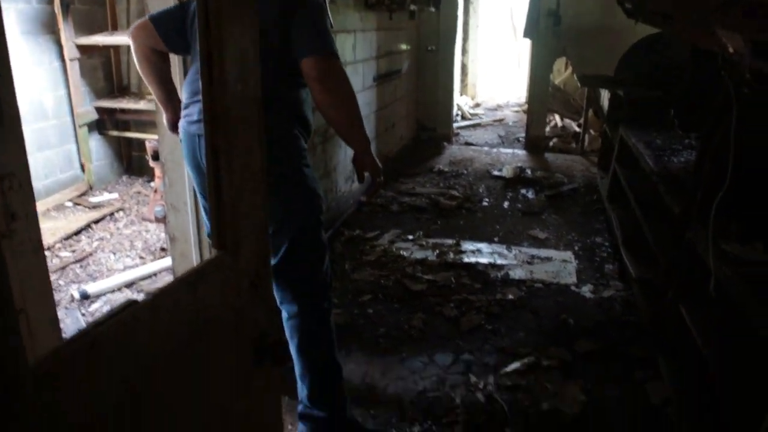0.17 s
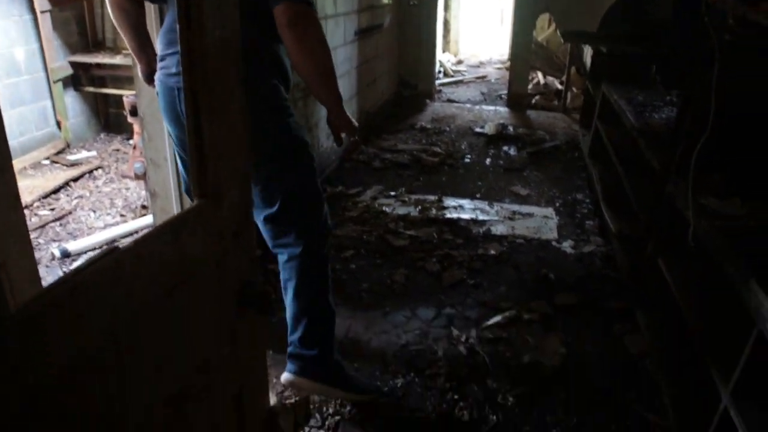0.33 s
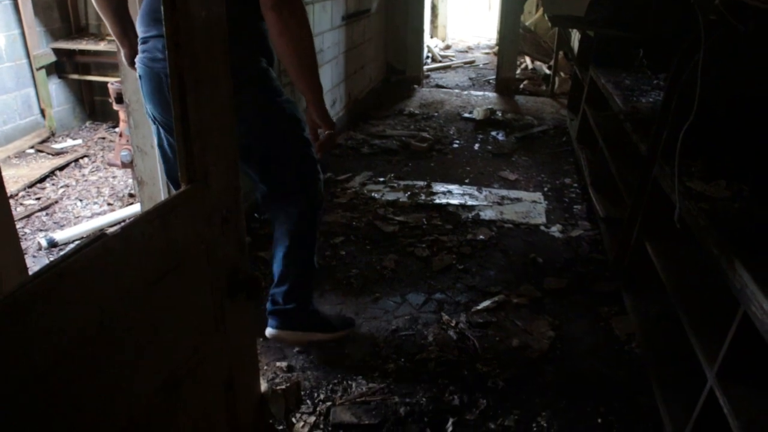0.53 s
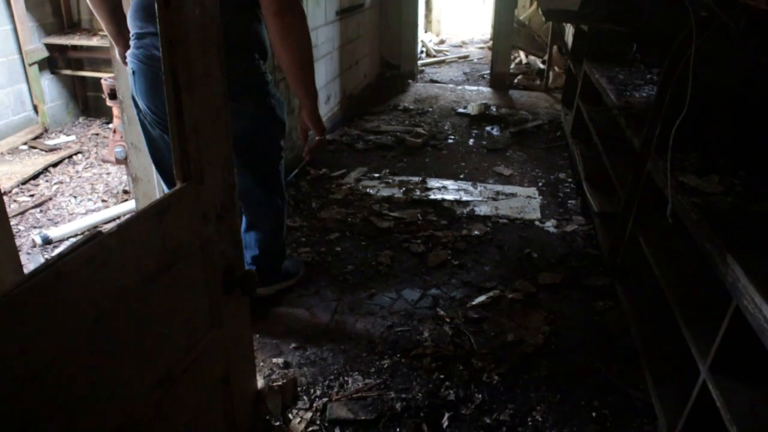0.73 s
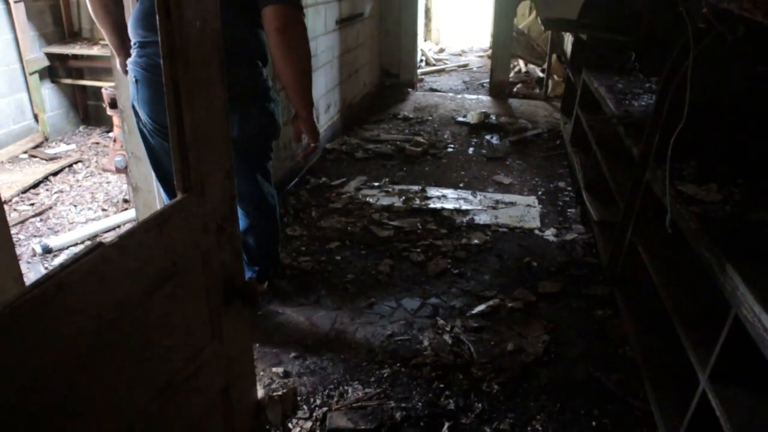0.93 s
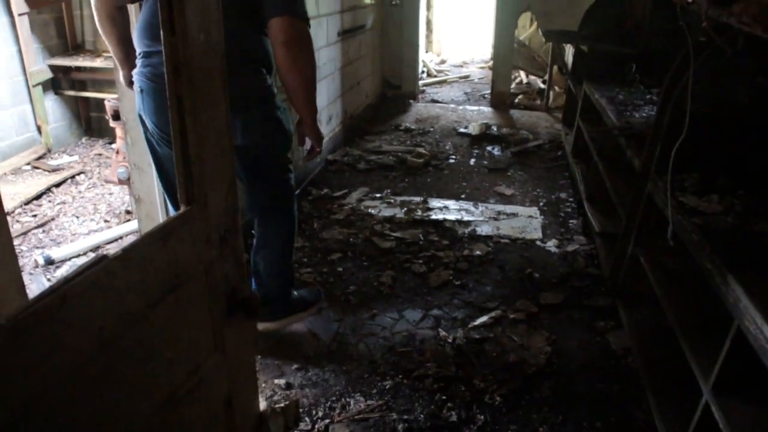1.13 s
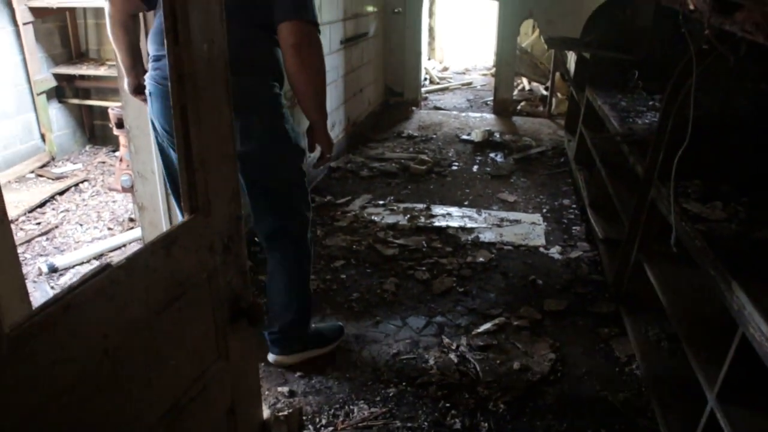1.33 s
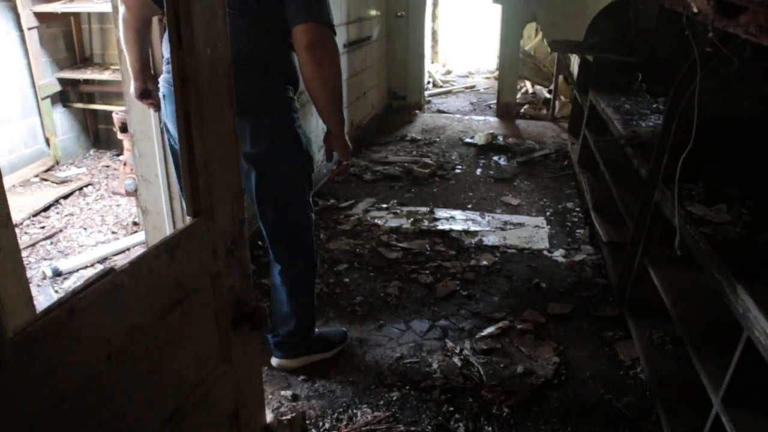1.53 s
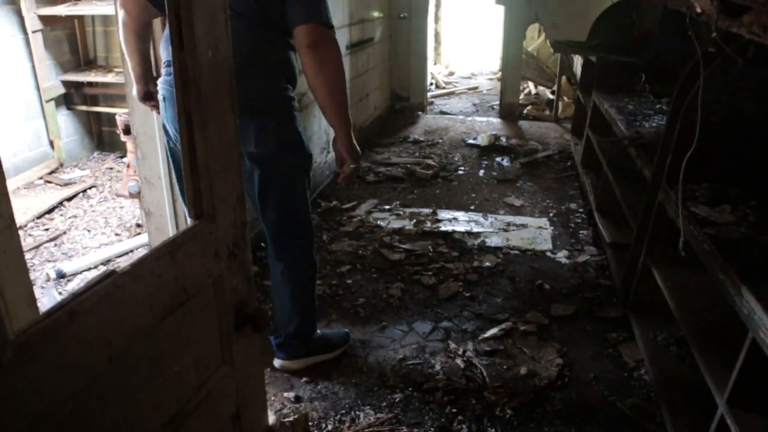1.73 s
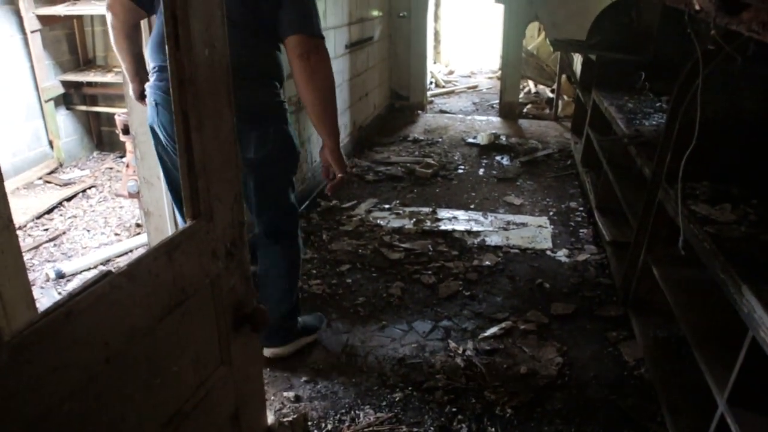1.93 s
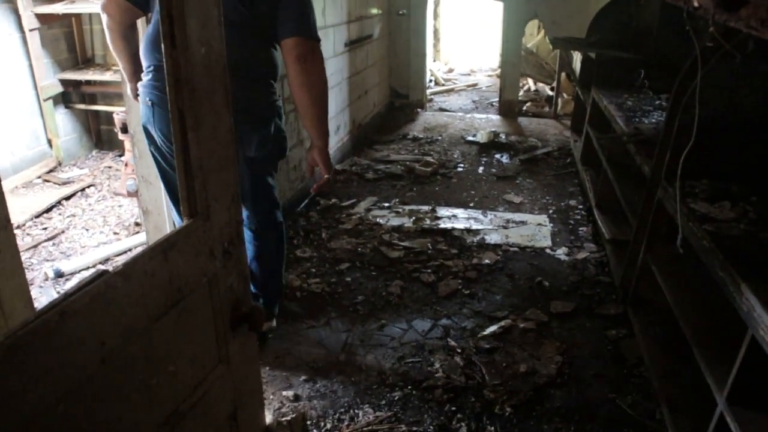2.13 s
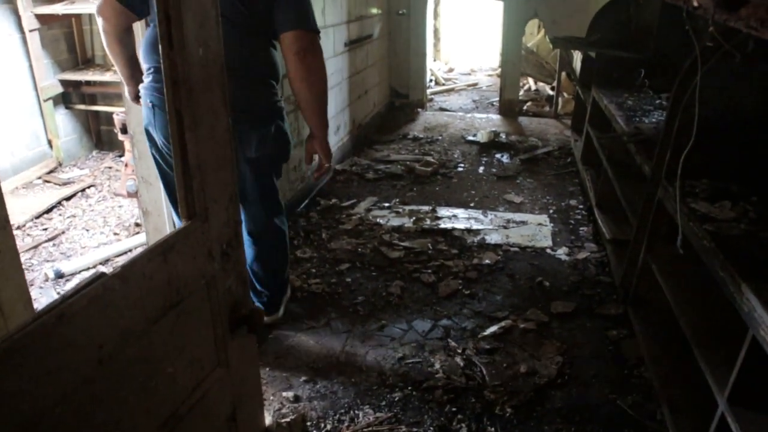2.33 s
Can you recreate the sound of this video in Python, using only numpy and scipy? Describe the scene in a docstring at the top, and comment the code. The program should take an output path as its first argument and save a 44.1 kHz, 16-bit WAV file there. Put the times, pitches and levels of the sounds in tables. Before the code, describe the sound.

A shoe crunches debris in an abandoned room, first a fading scuff, then the loudest gritty grind, a faint shuffle and a final crackling step, with short echo and quiet rumble and hiss behind.

```python
"""Shoes shuffle on broken tile and grit in an empty building, over quiet rumble and hiss.
A drag of the sole is already fading at the start, with soft thuds, then cracks and rattling shards.
The loudest drag comes at 0.7 s, a faint one at 1.4 s and another strong one just after 2 s.
Grit is made of random clicks through many tuned filters; thuds, cracks and shards are short rings.
A small bare room answers them all with a short tail of fading noise."""
import sys
import numpy as np
from scipy import signal
from scipy.fft import rfft, irfft
from scipy.io import wavfile
from scipy.ndimage import uniform_filter1d

SR = 44100
rng = np.random.default_rng(int(sys.argv[2]) if len(sys.argv) > 2 else 0)


def transcribe(u):
    """Save the signal u as a 16-bit wav file named by the first command-line argument.

    u: samples, shape (n,) or (channels, n), limited to [-1, 1]; the rate is SR.
    q: integer samples, one column per channel.
    """
    v = np.clip(np.atleast_2d(u).T, -1, 1)
    q = np.round(v * 32767).astype(np.int16)
    wavfile.write(sys.argv[1], SR, q)


N = 104869  # length in samples

# How hard the sole grinds during each drag. Each row: time in seconds, grit level in dB, then
# three levels in dB relative to the grit: low rub of the sole, coarse grit, fine treble.
FIRST_DRAG = [(0.0, -25, 6.5, -2, -7), (0.014, -26.5, -8.5, -9, 0.5), (0.086, -43.5, 0, -4, -4.5),
              (0.15, -49, -4.5, 0.5, -5.5), (0.158, -38.5, -16, -8, -10), (0.168, -45, 2.5, -13, 0),
              (0.196, -53.5, -5, -4, -5), (0.258, -63.5, 12, 4, 3), (0.3, -69, 8, -7, -9)]
LOUDEST_DRAG = [(.686, -45, -33, -8, -25), (.698, -17, -17, -6.5, -10), (.706, -19, -21, -14, -33),
                (.73, -23.5, -37, -5.5, -15), (.745, -26.5, -9, -6, -4.5), (.8, -28, -10, -5, -7),
                (.858, -28, -1.5, -5, -11), (.89, -30.5, -4.5, -4.5, 0), (.94, -40.5, -4, -5.5, -4.5),
                (.98, -50.5, -2, -10, -2), (1.04, -51, -5, 1, 0), (1.108, -54, -11, -5, -2),
                (1.118, -40.5, -20, 1, -12), (1.14, -48, -25, -7, -10), (1.208, -59, -12, -2, -2),
                (1.3, -68, -20, -3, -14)]
FAINT_DRAG = [(1.415, -79, 11, 4, -8), (1.421, -57.5, 0, -5, -11), (1.451, -47.5, 3, -2.5, -4.5),
              (1.473, -52, -8, -11, -9), (1.527, -67, 0, -5, -5), (1.587, -63, -4, -13, -5),
              (1.62, -57, -19, -19, -22)]
LAST_DRAG = [(1.89, -76, 8, 2, -5), (1.92, -56, 7, -7, 1), (1.958, -52.5, -15, 0, -4.5),
             (1.97, -40, -10, -10, -9), (1.982, -39.5, -9, -3.5, -4.5), (2.068, -28.5, -11.5, -9, -10.5),
             (2.11, -32, -9, -8.5, -5.5), (2.178, -33, -8.5, -5.5, -11.5), (2.278, -39.5, -3, -6.5, -6),
             (2.326, -51, -1, -1, -2), (2.378, -47, -8, -10, -0.5)]

# Tone colour of the grit on each patch of floor. Each row: frequency in Hz, relative level in dB per Hz.
FIRST_PATCH = [(150, 0.5), (300, -0.5), (506, 2), (1130, -2), (1400, -12), (2420, -17), (2900, -3.5),
               (3680, -6.5), (7620, -7), (10000, -15), (12500, -44), (15500, -40)]
LOUDEST_PATCH = [(150, -12.5), (400, -10.5), (585, -2), (1190, -3.5), (1350, -11), (1740, -2.5),
                 (2500, -2.5), (3610, -1), (6000, -6), (8660, -7.5), (11500, -23.5), (14000, -25),
                 (15500, -30)]
LAST_PATCH = [(150, -27), (506, -10.5), (742, -4.5), (1560, -12), (2300, -7), (2750, -3), (3200, -4),
              (3800, -3), (6000, -8), (8200, -10.5), (12000, -26.5), (15500, -36)]

# Tone colour of the rumble and hiss. Each row: frequency in Hz, relative level in dB per Hz.
AIR_COLOUR = [(20, -22), (40, -5.5), (64, -2.5), (120, -8), (289, -17.5), (478, -20.5), (800, -18),
              (1230, -19), (1700, -23.5), (4000, -29), (8000, -31), (12000, -36.5), (15500, -39)]

# Soft heel and toe thuds. Each row: start in seconds, level in dB, pitch in Hz,
# time to fade by 60 dB in seconds.
HEEL_TOE_THUDS = [(.003, -20.5, 501, 0.048), (.012, -24.5, 651, 0.077), (.055, -30, 170, 0.062),
                  (0.2746, -27.5, 360, 0.036), (.284, -28.5, 96, 0.11), (.302, -31, 101, 0.076),
                  (.335, -42.5, 219, 0.084), (.355, -38.5, 73, 0.087), (0.531, -40, 79, 0.099),
                  (1.075, -41.5, 264, 0.094), (1.098, -39.5, 240, 0.12), (1.151, -39.5, 76.6, 0.08),
                  (1.4223, -33, 406, 0.032), (1.426, -37, 643, 0.033), (1.431, -39.5, 187, 0.057),
                  (1.456, -40, 198, 0.035), (1.512, -40, 70, 0.11)]

# Pieces that crack or tick. Each row: start in seconds, level in dB, pitch in Hz,
# time to fade by 60 dB in seconds.
CRACKING_PIECES = [(0.0898, -25.5, 4090, 0.017), (.114, -43, 3730, .008), (0.158, -29, 4030, 0.016),
                   (.165, -30.5, 2300, 0.012), (.168, -36.5, 640, 0.039), (.218, -33, 1500, .006),
                   (.071, -25, 1010, 0.01), (.2512, -32.5, 700, .005), (.254, -36.5, 876, 0.026),
                   (.459, -35.5, 3000, 0.0033), (0.6947, -11.5, 3880, 0.011), (0.697, -10, 4600, 0.01),
                   (.7, -6, 3000, 0.0059), (.712, -16, 3800, 0.017), (0.75, -21, 2640, .01),
                   (1.0435, -30.5, 3500, 0.026), (1.049, -36, 750, 0.0087), (1.1137, -25, 1640, 0.0048),
                   (1.4234, -36, 2700, .004), (1.446, -37, 2880, 0.015), (1.4546, -32, 4020, .004),
                   (1.9142, -39, 5530, .006), (2.007, -25, 2800, 0.015), (2.039, -25, 3600, .012),
                   (2.06, -16.5, 3040, .012), (2.063, -17, 2520, .012), (2.0873, -13.5, 3560, 0.0029),
                   (2.139, -27, 2710, .01)]

# Loose shards that rattle. Each row: start in seconds, length in seconds, pitch in Hz,
# average (rms) level in dB, time to fade by 60 dB in seconds.
LOOSE_SHARDS = [(.125, 0.044, 4040, -48.5, .015), (.152, 0.024, 5500, -44, 0.025),
                (0.7, 0.027, 3130, -26, 0.033), (0.929, 0.03, 4530, -48, .03),
                (1.002, 0.085, 6550, -49.5, 0.027), (1.005, 0.022, 4700, -51, .03),
                (1.043, 0.059, 3520, -45.5, 0.028), (1.048, .055, 8870, -55, .03),
                (1.107, 0.039, 6550, -52, 0.035), (1.116, 0.038, 1930, -47, 0.015),
                (1.159, 0.034, 7600, -55, .04), (1.179, 0.023, 3370, -56, .03),
                (1.238, 0.016, 7480, -65, .04), (1.965, 0.14, 2860, -43.5, 0.017),
                (2.033, 0.054, 3700, -41.5, .02), (2.054, 0.22, 2620, -40.5, 0.015)]

GRAINS_PER_S, GRAIN_SCATTER_DB, FLUTTER_DB = 2500, 1.5, 1
SHARED = 0.38  # weight of the clicks that all grain sizes have in common
AIR_DB = -49
SNAP_DB = -10
RATTLE_PER_S, RATTLE_SCATTER_DB = 700, 1.6
ROOM_T60_S, ROOM_DB, ROOM_HZ = 0.3, -11.5, 5100
TOP_HZ = 15750


def undb(db):
    """Turn decibels into a plain multiplier."""
    return 10 ** (np.asarray(db) / 20)


def rms1(x):
    """Scale a sound to an average (rms) level of 1."""
    return x / np.sqrt(np.mean(x ** 2))


def mode(x, hz, t60):
    """One fading ring: each click in x starts a sine at hz that drops 60 dB in t60 seconds."""
    pole = np.exp(2j * np.pi * hz / SR - np.log(1000) / (t60 * SR))
    return signal.lfilter([1], [1, -pole], x).imag


def spectrum(table, hz):
    """Read a tone colour at any frequency, with straight lines over log frequency."""
    table_hz, db = np.array(table).T
    return np.interp(np.log(hz), np.log(table_hz), db)


def walk(rate):
    """A wandering level: a new random value rate times a second, joined by ramps, spread about 1."""
    hold = int(SR / rate)
    steps = np.repeat(rng.standard_normal(N // hold + 1), hold)
    return rms1(uniform_filter1d(steps, hold))[:N]


def clicks(n, rate, scatter_db):
    """Clicks at random times with random sign, a few of them larger."""
    chance = rng.random(n)
    sign = np.sign(rng.standard_normal(n))
    size = undb(scatter_db * rng.exponential(size=n))
    # the steep slope makes nearly every click either full or absent
    return np.clip((rate / SR - chance) * 2000, 0, 1) * sign * size


def peak_filter(x, hz, q):
    """Keep a narrow band around hz; a higher q is narrower."""
    return signal.lfilter(*signal.iirpeak(hz, q, SR), x)


def grains(hz):
    """Grains of every size click; each size rings a few cycles at its own pitch."""
    common = rms1(clicks(N, GRAINS_PER_S, GRAIN_SCATTER_DB))
    streams = []
    for _ in range(6):
        own = rms1(clicks(N, GRAINS_PER_S, GRAIN_SCATTER_DB))
        streams.append(SHARED * common + (1 - SHARED) * own)
    bands = []
    for k, pitch in enumerate(hz):
        ringing = peak_filter(streams[k % 6], pitch, 5.6)
        bands.append(rms1(peak_filter(ringing, pitch, 7.7)))
    return np.array(bands)


def drag(curve, colour, hz, bed):
    """The sole presses the grains as hard as its curve says, in the colour of this patch of floor."""
    points = np.array(curve)
    first, last = int(points[0, 0] * SR), min(int(points[-1, 0] * SR) + 1, N)
    t = np.arange(first, last) / SR
    grit, rub, coarse, fine = (np.interp(t, points[:, 0], points[:, k]) for k in range(1, 5))
    # the bands widen with pitch, so each gets more power than its level per Hz
    band_db = spectrum(colour, hz) + 10 * np.log10(hz)
    # four groups of bands: rub, coarse grit, main grit, fine treble
    group = np.searchsorted([1350, 2450, 6800], hz)
    # each group's loudness is set from the bands between these limits in Hz
    limits = [(350, 1300), (1400, 2400), (2500, 6500), (7000, 14000)]
    out = np.zeros(N)
    for g, relative_db in enumerate((rub, coarse, 0, fine)):
        low, high = limits[g]
        power = np.sum(undb(2 * band_db[(hz > low) & (hz < high)]))
        weight = undb(band_db[group == g]) / np.sqrt(power)
        out[first:last] += weight @ bed[group == g, first:last] * undb(grit + relative_db)
    return out


def air():
    """Coloured noise split near 100 Hz: a wavering rumble below and a slightly wavering hiss above."""
    f = np.fft.rfftfreq(N, 1 / SR) + 1
    noise = rfft(rng.standard_normal(N)) * undb(spectrum(AIR_COLOUR, f)) * (f > 18)
    low = 1 / (1 + (f / 100.0) ** 2)
    rumble = irfft(noise * low, N) * undb(1.2 * walk(7.84))
    hiss = irfft(noise * (1 - low), N) * undb(0.78 * walk(5.22))
    return undb(AIR_DB) * rms1(rumble + hiss)


def thuds():
    """Soft pushes into the floor; each spot answers at its own low pitch, with a weaker overtone."""
    n = 8000
    out, push = np.zeros(N + n), np.zeros(n)
    push[0] = -1
    for start, db, hz, t60 in HEEL_TOE_THUDS:
        i = int(start * SR)
        ring = mode(push, hz, t60) + 0.21 * mode(push, 1.7 * hz, 0.63 * t60)
        out[i:i + n] += undb(db) * ring
    return uniform_filter1d(out[:N], size=24)  # averaging neighbours softens the edges


def cracks():
    """A piece breaks or jumps: a sharp snap of noise and a brief ring with an overtone."""
    n, snap_n = 3000, 400
    out, click = np.zeros(N), np.zeros(n)
    click[0] = 1
    snap_fade = np.exp(-np.arange(snap_n) / 60)
    for start, db, hz, t60 in CRACKING_PIECES:
        i = int(start * SR)
        piece = mode(click, hz, t60) + 0.2 * mode(click, 1.44 * hz, 1.4 * t60)
        puff = rng.standard_normal(snap_n) * snap_fade
        piece[:snap_n] += undb(SNAP_DB) * mode(puff, hz, 0.001) / 4
        # remove what lies well below the pitch
        thin = signal.lfilter(*signal.butter(2, 0.34 * hz, "high", fs=SR), piece)
        out[i:i + n] += undb(db) * thin
    return out


def shards():
    """A loose shard chatters on the floor and rings at a close pair of pitches."""
    n = SR // 3
    out, t = np.zeros(N + n), np.arange(n) / SR
    for start, length, hz, db, t60 in LOOSE_SHARDS:
        i = int(start * SR)
        taps = clicks(n, RATTLE_PER_S, RATTLE_SCATTER_DB)
        taps[0] = 1.8  # a sure first knock
        taps = taps * np.clip(1 - (t / length) ** 3, 0, 1)
        ring = mode(taps, hz, t60) + 0.37 * mode(taps, 1.03 * hz, 0.76 * t60)
        out[i:i + n] += undb(db) * ring / np.sqrt(np.sum(ring ** 2) / (length * SR))
    return out[:N]


def room(x):
    """Bare walls send back many echoes: a short fading noise tail, duller than the source."""
    t = np.arange(SR // 2) / SR
    tail = rng.standard_normal(len(t)) * undb(-60 * t / ROOM_T60_S) * (t > .003)
    tail = signal.lfilter(*signal.butter(1, ROOM_HZ, fs=SR), tail)
    tail = tail / np.sqrt(np.sum(tail ** 2))
    return x + undb(ROOM_DB) * signal.fftconvolve(x, tail)[:N]


def scene():
    """Four drags over one bed of grains, with thuds, cracks and shards in the room, plus air."""
    hz = np.geomspace(160, 15300, num=44)  # pitches of the grain sizes
    bed = grains(hz) * undb(FLUTTER_DB * walk(59.92))
    grit = drag(FIRST_DRAG, FIRST_PATCH, hz, bed)
    grit += drag(LOUDEST_DRAG, LOUDEST_PATCH, hz, bed)
    grit += drag(FAINT_DRAG, FIRST_PATCH, hz, bed)
    grit += drag(LAST_DRAG, LAST_PATCH, hz, bed)
    steps = grit + thuds() + cracks() + shards()
    return (room(steps) + air())[None]


def record(dry):
    """The recorder cuts the top: a steep filter removes nearly everything above TOP_HZ."""
    return signal.sosfilt(signal.ellip(10, .2, 80, TOP_HZ, fs=SR, output="sos"), dry)


dry = scene()
out = record(dry)
transcribe(out)
```